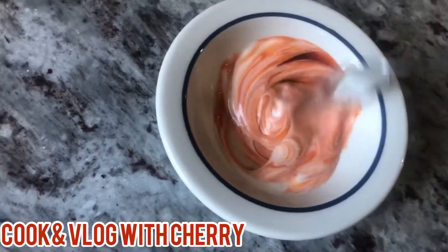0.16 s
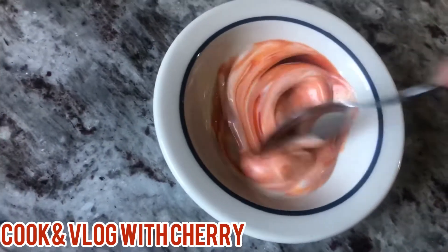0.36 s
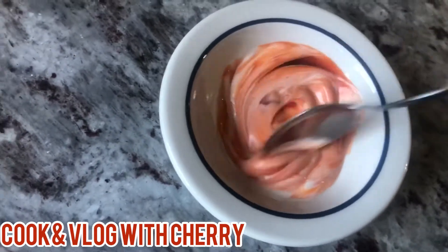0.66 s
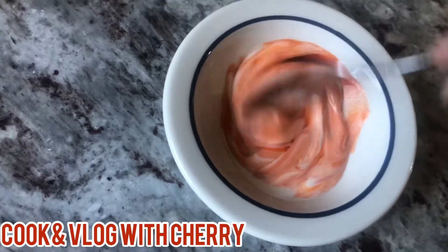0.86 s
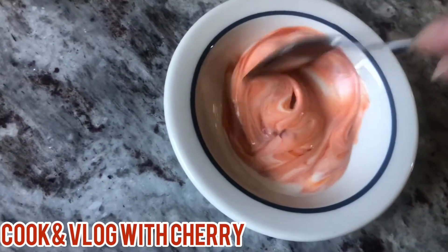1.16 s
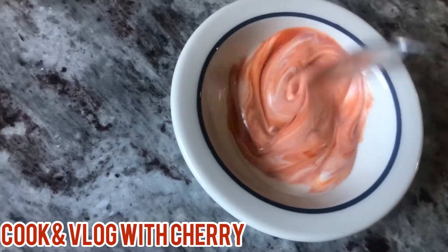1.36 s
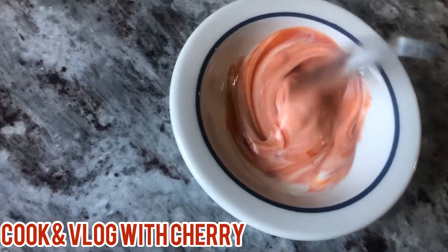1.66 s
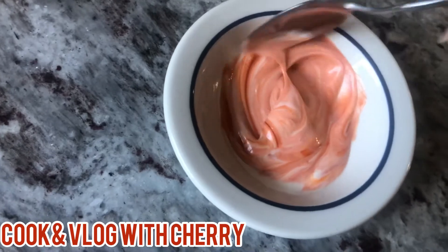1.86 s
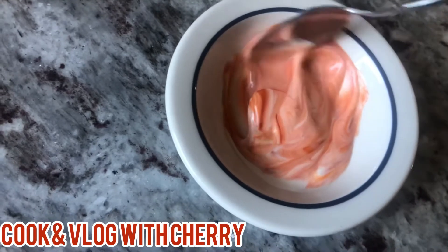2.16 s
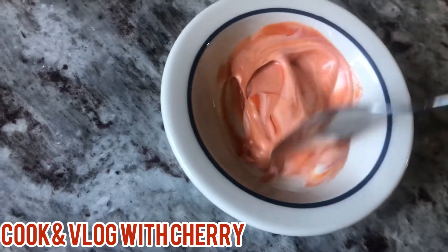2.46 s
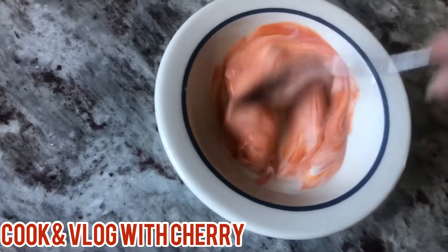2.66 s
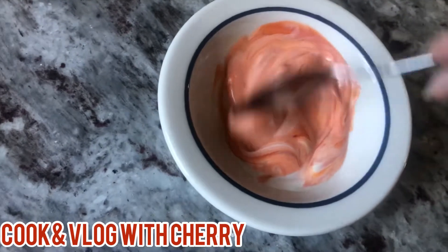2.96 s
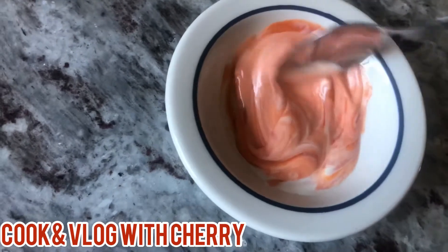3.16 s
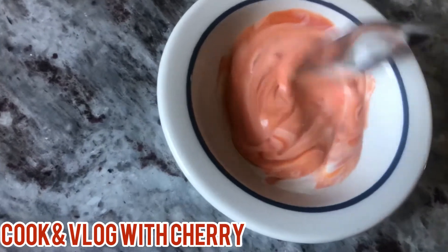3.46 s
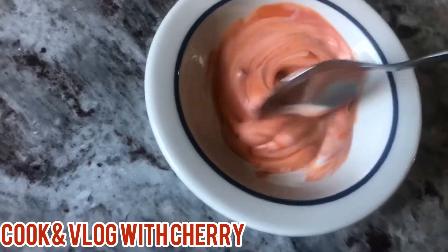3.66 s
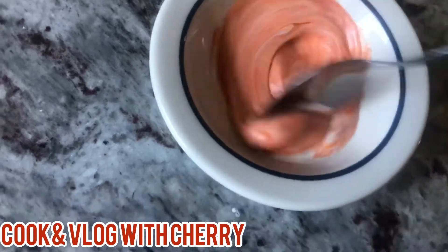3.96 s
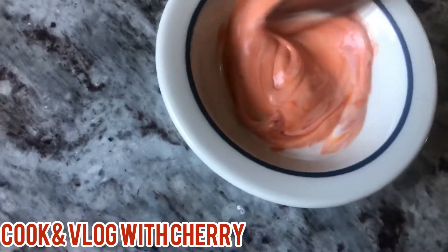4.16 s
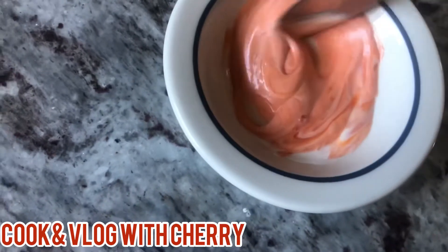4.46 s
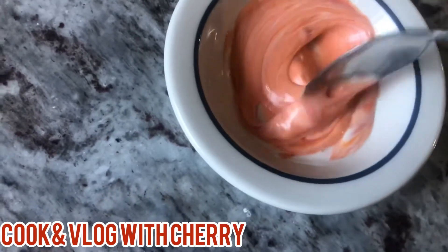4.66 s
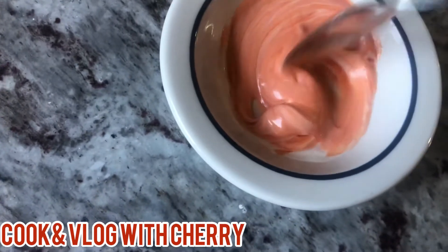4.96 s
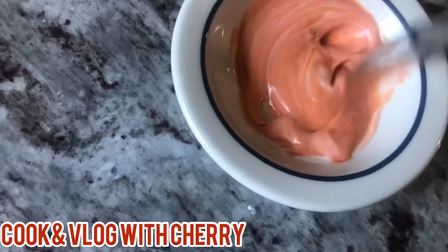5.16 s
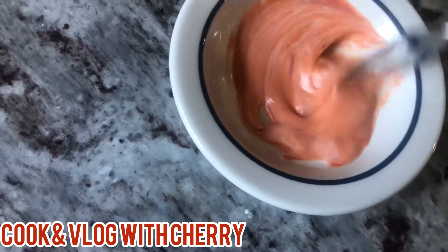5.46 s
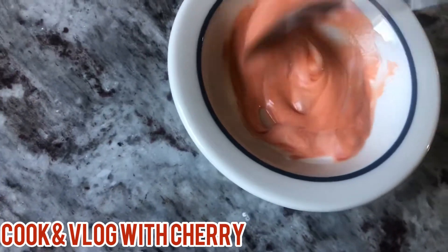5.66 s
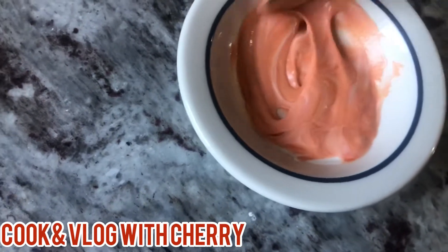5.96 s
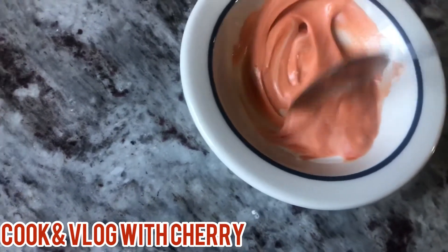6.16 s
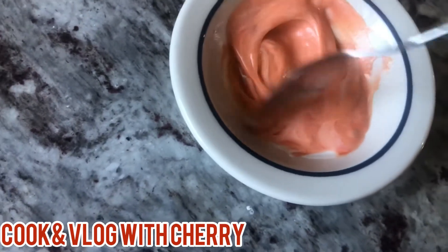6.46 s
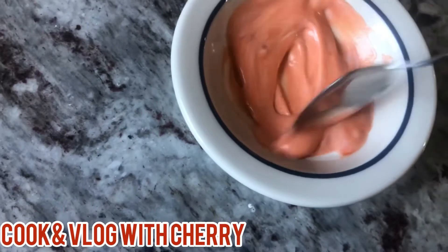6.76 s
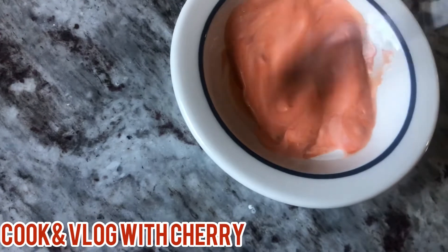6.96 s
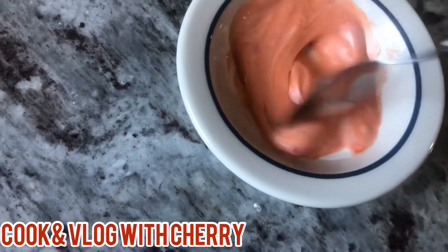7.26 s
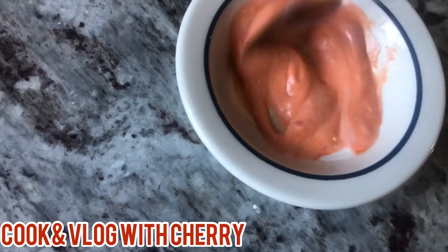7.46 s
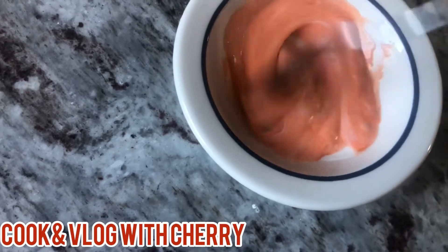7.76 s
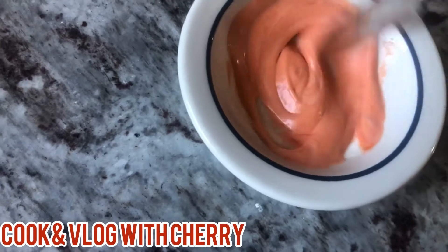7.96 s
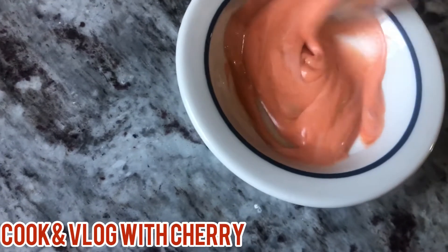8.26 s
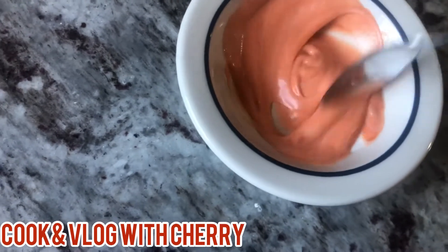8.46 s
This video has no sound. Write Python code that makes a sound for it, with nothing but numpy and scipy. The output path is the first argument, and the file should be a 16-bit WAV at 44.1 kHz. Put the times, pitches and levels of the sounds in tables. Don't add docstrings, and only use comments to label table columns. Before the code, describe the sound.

A metal spoon stirs thick sauce in a small ceramic bowl, scraping wetly and grittily with sharp bright clinks, growing faster, in a quiet kitchen.

```python
import sys
import numpy as np
from scipy import signal
from scipy.fft import rfft, irfft, next_fast_len
from scipy.io import wavfile
from scipy.ndimage import uniform_filter1d, map_coordinates

SR = 44100
rng = np.random.default_rng(int(sys.argv[2]) if len(sys.argv) > 2 else 0)


def store_pcm(level_fs):
    pcm = np.round(np.clip(level_fs, -1, 1) * 32767).astype(np.int16)
    wavfile.write(sys.argv[1], SR, np.atleast_2d(pcm).T)


def ratio(d):
    e = np.asarray(d, float) / 20
    return 10 ** e


N = 380141

# frequency [Hz], width [Hz], level [dB].
LOW_MODES = [(1057, 73, 6.5), (1321, 237, 8.5), (1561, 145, 8)]
# frequency [Hz], width [Hz], level [dB].
MIDDLE_MODES = [(1827, 34, 1.5), (2300, 240, 6), (2820, 380, 3.5), (3112, 990, 7), (3985, 195, -2.5),
                (4410, 270, -10.5)]
# frequency [Hz], width [Hz], level [dB].
BRIGHT_MODES = [(5500, 600, -13), (6550, 300, -4), (7550, 300, -9), (8350, 600, -13), (9200, 300, -8),
                (11450, 350, -12), (12100, 300, -13), (12900, 500, -19), (13800, 400, -14),
                (14900, 600, -20)]
# frequency [Hz], t60 [s], level [dB].
RIM_LOW_MODES = [(2677, .32, -19), (2714, .055, -2), (2700, .25, -23), (2684, .06, -5), (2970, .05, -9),
                 (3930, .04, -14)]
# frequency [Hz], t60 [s], level [dB].
RIM_HIGH_MODES = [(6257, .3, -19), (6270, .1, 0), (6287, .26, -19), (10793, .075, 0), (10810, .16, -23),
                  (13780, .03, -20)]


def unit(x):
    return x / np.sqrt(np.mean(np.abs(x) ** 2) + 1e-20)


def along(points, hz):
    f, v = np.transpose(points)
    return np.interp(np.log(hz + 1), np.log(f + 1), v)


def wobble(knots_per_s):
    knots = rng.standard_normal(int(N * knots_per_s / SR) + 4)
    return map_coordinates(knots, [np.arange(N) * knots_per_s / SR])


def filtered(x, response):
    m = next_fast_len(N + SR // 2)
    return irfft(rfft(x, m) * response(np.fft.rfftfreq(m, 1 / SR)), m)[:N]


def body(x, modes):
    scale = SR / (2 * np.pi * sum(ratio(db) * w for _, w, db in modes))

    def response(f):
        return sum((-1) ** k * ratio(db) * 1j * f * w / (c * c - f * f + 1j * f * w)
                   for k, (c, w, db) in enumerate(modes))

    return scale * filtered(x, response)


def rim(x, modes):
    widths_hz = [np.log(1000) / (np.pi * t60) for _, t60, _ in modes]
    return body(x, [(hz, w, db - 20 * np.log10(w)) for (hz, _, db), w in zip(modes, widths_hz)])


def swells(s, length_s, db):
    rise, fall, sharpness = 0.43, 0.37, 2.36
    t, out = np.arange(N) / SR, np.zeros(N)
    for at, span, top_db in zip(s, length_s, db):
        near = slice(max(int((at - 2 * span) * SR), 0), int((at + 2 * span) * SR))
        late = t[near] - at
        side_s = span * np.where(late < 0, rise, fall)
        out[near] += ratio(top_db) * np.exp(-np.abs(late / side_s) ** sharpness)
    return out


def appliances():
    # frequency [Hz], density [dB per Hz].
    hum_spectrum = [(25, -40.5), (50, -5), (105, -2.5), (160, -12), (210, -6), (400, -7), (700, -14),
                    (900, -15), (1500, -18), (3000, -29.5), (8000, -41), (9900, -31.5), (13000, -48.5),
                    (15000, -37.5)]
    # frequency [Hz], level [dB].
    whines = [(84, -70), (106, -69), (212, -73), (242, -73), (405, -73), (524, -75), (695, -77),
              (9798, -92), (9900, -93), (14998, -96), (15299, -98)]
    t = np.arange(N) / SR
    hum = unit(filtered(rng.standard_normal(N), lambda hz: ratio(along(hum_spectrum, hz))))
    hum = ratio(-58.5 + 1.3 * wobble(0.9)) * hum
    whine = sum(ratio(db + 3 + 3 * wobble(8)) * np.sin(2 * np.pi * hz * t + 1.5 * wobble(12))
                for hz, db in whines)
    return hum + whine


def traffic():
    # time [s], length [s], level [dB].
    lorry = (3.0, .4, -58)
    spectrum = [(15, -46), (30, -30.5), (50, -25.5), (70, -37), (200, -114)]  # Hz, dB
    rumble = unit(filtered(rng.standard_normal(N), lambda hz: ratio(along(spectrum, hz))))
    return (ratio(-70) + swells(*np.transpose([lorry]))) * rumble


def last_knock():
    echo_db, echo_t60_s, low_ring_db, high_ring_db = -48.5, 0.5, -43, -51
    t = np.arange(N) / SR
    echo = unit(body(rng.standard_normal(N), [(765, 280, 0)]))
    echo = ratio(echo_db - 60 * t / echo_t60_s) * echo
    ring = ratio(low_ring_db) * rim(t == 0, RIM_LOW_MODES[:1])
    return echo + ring + ratio(high_ring_db) * rim(t == 0, RIM_HIGH_MODES[::4])


def clinks():
    # time [s], peak [dB], thud [dB], bright [dB].
    touches = [(.004, -40, 0, -26), (0.2042, -31, 6.5, -16), (1.272, -45.5, -28, 8), (1.304, -29, 0, -16),
               (1.638, -60.5, 21.5, -39.5), (2.7153, -35, 2, 3), (3.195, -29.5, 6, -27),
               (3.6262, -37, -15, -27), (3.749, -31.5, 2.5, -29), (4.318, -23.5, 2, -16),
               (4.7, -42, -22.5, -9), (5.1676, -29, -12, -38.5), (5.492, -28.5, -9, -13),
               (5.805, -41.5, -31, 10), (5.8317, -30.5, -9, 1.5), (6.594, -33, 9.5, -24),
               (7.133, -26.5, 7.5, -23), (7.1721, -23.5, -9, -4.5), (7.2939, -24, 5.5, -4),
               (7.7022, -22.5, 3.5, -5)]
    # time [s], peak [dB], bright [dB],
    # low rim [dB], high rim [dB].
    knocks = [(0.1129, -28, -25, -49, -62), (0.134, -11.5, -4.5, -50, -59), (0.3201, -23.5, -10, -40, -43),
              (0.8673, -21, -9, -41, -47), (1.3105, -12.5, 0, -37, -44), (1.3687, -17.5, -10, -33, -52),
              (1.7455, -19, 6.5, -26.5, -22), (2.0905, -26.5, 4, -30.5, -33),
              (2.3677, -5, -9.5, -35.5, -34.5), (2.594, -2.5, -7, -37, -42), (2.838, -2, -10, -33, -44),
              (4.7225, -1, -3.5, -29, -30.5), (4.9969, -0.5, -17, -34.5, -29.5),
              (5.1041, -41, 11, -14, -18), (5.3658, -13, -1, -29.5, -38.5), (5.426, -22, -31.5, -52, -37),
              (6.2593, -16.5, 6.5, -29, -37), (6.4534, -21, -3, -44, -86), (6.5555, -22, -7.5, -35, -64),
              (6.6859, -13, -13, -29, -41), (2.954, -30, -19, -31, -51), (7.7589, -12.5, -10.5, -32.5, -39),
              (7.809, -18, -6, -29, -47), (7.9517, -31.5, 0, -30, -46)]
    # time [s], peak
    # [dB], thud [dB], bright [dB].
    ticks = [(0.0403, -26, -10, -21), (0.2333, -20, -20, -5), (0.407, -21, -12, 0.5),
             (0.538, -24, -14, -8), (0.646, -19, -14, -1.5), (0.7, -23, -13, -3),
             (0.9938, -23, -8, -12), (1.0095, -24, -4.5, 0), (1.1145, -17.5, -18, -12),
             (1.432, -19.5, -5, -11), (1.8417, -22, -19, -9), (1.867, -28, -16, -12),
             (2.1634, -39, -15, -14), (2.1856, -42, -12, -12), (2.206, -21.5, 1, -5),
             (3.0127, -25, -14, -12), (3.1588, -25, 6, -8), (3.2054, -27, -10, -4),
             (3.2226, -24, 7, -14), (3.3383, -36, -19, -12), (3.374, -21, -24, 1),
             (3.424, -26.5, -15, 2), (3.4914, -38, -10, -12), (3.6404, -22, -14, -7),
             (3.662, -18.5, -16, -18), (3.7963, -24.5, -11, -6), (3.8387, -21, -19, -12),
             (3.9609, -17, -15, -4), (3.9958, -36, -15, -12), (4.1462, -24, -20, -5),
             (4.397, -31, -10, -10), (4.416, -23, 1, -11), (4.4857, -14.5, -13, -2.5),
             (4.5694, -53, -8, -13.5),
             (5.078, -31, -20, 11), (6.016, -30, 11.5, -17.5), (5.1382, -19.5, -15, -10),
                  (5.8664, -41, -10, -10), (5.9406, -27, -1, -10), (6.0664, -40, -5, -15),
                  (6.178, -49, -11.5, -11), (6.332, -31, 3, -15), (6.6357, -11, -11, -11),
                  (6.8702, -23, -7, -2), (6.913, -16.5, -25, -8), (7.0283, -14.5, -18, -5),
                  (7.073, -29, -4, -1), (7.1118, -29, 7, -24), (7.239, -24, -11, -12),
                  (7.397, -18, -15, -1), (7.438, -17, -19, -16), (7.5303, -17.5, -23, -0.5),
                  (7.57, -20, -8, 1), (7.654, -18, 2, -16), (7.6761, -6, -10, -12), (7.898, -29, -10, -10),
                  (8.0292, -18, -20, -17), (8.128, -27, -17, -14), (8.2147, -21.5, -15, -22),
                  (8.2514, -30, -10, -16), (8.2864, -27, -16, -17), (8.4082, -17.5, -19, -16),
                  (8.4427, -23, -24, 4), (8.4623, -17, -23, -13), (8.515, -36, -3, -17),
                  (8.536, -18, -8, -21), (6.261, -8.5, -13, 5), (6.2622, -9.5, -4.5, 9)]
    # time [s], chatter [dB], chatter t60 [s], top rim modes [dB].
    landings = [
        (1.31, -3, 0.039, 17),
        (1.745, 2.5, 0.038, 1),
        (2.367, -8, 0.038, -0.5),
        (2.594, -1, 0.021, -13),
        (2.838, -18, 0.06, -8),
        (4.722, -4, 0.044, 2.5),
        (4.996, -4, 0.027, 0),
        (5.366, -1, 0.028, 2.5),
        (6.259, 6.5, 0.025, 13),
    ]
    thud_db, thud_per_db = -16.5, -0.61
    touch_rim_db, rim_per_thud, touch_high_rim_db = -31, 0.6, -39.5
    tick_db = -10.5
    chatter_db, chatter_t60_s, rebound_bright_db = -3.5, 0.031, -6.5
    foot_per_db = 0.8

    rows = [(s, db, thud_db + thud_per_db * db, *rest) for s, db, *rest in knocks]
    rows += [(*row, touch_rim_db + rim_per_thud * row[2], touch_high_rim_db) for row in touches]
    rows += [(s, db + tick_db, thud, bright, touch_rim_db, touch_high_rim_db)
             for s, db, thud, bright in ticks]
    table = np.array(rows)
    landing = np.tile([chatter_db, chatter_t60_s, 0.], (len(table), 1))
    for s, *row in landings:
        landing[np.argmin(np.abs(table[:, 0] - s))] = row

    t = np.arange(int(.012 * SR)) / SR
    draw = rng.standard_normal((len(table), 2, len(t)))
    sparse = draw[:, 0] * (np.abs(draw[:, 1]) > 1.3)
    chatter = .21 * sparse * ratio(landing[:, :1] - 60 * t / landing[:, 1:2])
    chatter[:, :3] = [.3, .7, .3]
    at = np.round((table[:, :1] + .0005) * SR).astype(int) + np.arange(len(t))

    def blows(db, count=None):
        force = ratio(db)[:, None] * chatter[:, :count]
        return np.bincount(at[:, :count].ravel(), force.ravel(), N + len(t))[:N]

    def dulled(hz):
        return 1 / (1 + 1j * hz / 13000) ** 2 / (1 + (hz / 13000) ** 6)

    peak, thud, bright, low_rim, high_rim = table[:, 1:].T
    crack = ratio(11.5) * body(blows(peak, count=3), [(2960, 2670, 1)])
    wet = ratio(10.0) * body(blows(peak), MIDDLE_MODES) + ratio(2.0) * body(blows(peak + thud), LOW_MODES)
    bright_blows = blows(peak + bright + rebound_bright_db) + blows(peak + bright, count=3)
    wet = wet - ratio(10.0) * filtered(body(bright_blows, BRIGHT_MODES), dulled)
    foot = blows(peak + thud + np.maximum(thud, 0) + foot_per_db * peak)
    thump = ratio(-10) * body(foot, [(450, 140, -4.5), (726, 120, -1.0)])
    thump = np.roll(thump, int(0.00696 * SR))
    ring = ratio(22.5) * rim(blows(peak + low_rim, count=3), RIM_LOW_MODES)
    ring = ring + ratio(18.0) * rim(blows(peak + high_rim, count=3), RIM_HIGH_MODES[:3])
    top = blows(peak + high_rim + landing[:, 2], count=3)
    ring = ring + ratio(15) * rim(top, RIM_HIGH_MODES[3:])
    return crack + wet + thump + ring


def strokes():
    # start [s], end [s], pressure [dB], rim [dB].
    contacts = [(0.041, 0.057, -40.5, -68), (0.151, 0.28, -45, -59.5), (0.317, 0.527, -50, -74),
                (0.48, 0.816, -45.5, -70), (0.876, 1.17, -49, -83), (1.372, 1.488, -45.5, -63),
                (1.77, 1.949, -51.5, -63.5), (2.106, 2.283, -52.5, -72), (2.382, 2.493, -49, -71),
                (2.596, 2.756, -45.5, -61), (2.838, 3.142, -47.5, -78), (3.151, 3.697, -46.5, -67.5),
                (3.702, 4.114, -47, -64), (4.097, 4.41, -42.5, -65.5), (4.406, 4.532, -48, -56.5),
                (4.735, 4.835, -47.5, -57), (5.002, 5.148, -46.5, -81), (5.173, 5.274, -48.5, -85.5),
                (5.374, 5.457, -47, -86), (5.501, 5.678, -45.5, -66), (5.86, 6.0, -50.5, -66.5),
                (5.964, 6.108, -46, -64), (6.3, 6.407, -41, -64.5), (6.464, 6.493, -55, -81),
                (6.561, 6.958, -44.5, -67), (6.945, 7.352, -46, -84), (7.36, 7.733, -43, -60.5),
                (7.767, 7.919, -46.5, -83), (7.962, 8.304, -46.5, -61), (8.29, 8.624, -45.5, -69)]
    # time [s], length [s], share of pressure lost [0-1].
    turns = [(0.443, 0.048, 0.55), (0.981, 0.032, 1), (3.111, 0.037, 0.43), (3.268, 0.024, 0.32),
             (3.453, 0.024, 0.24), (3.705, 0.061, 0.38), (3.902, 0.043, 0.71), (4.132, 0.071, 0.54),
             (4.372, 0.062, 0.57), (6.828, 0.043, 0.75), (6.954, 0.088, 0.42), (7.089, 0.053, 0.81),
             (7.374, 0.044, 0.76), (7.506, 0.08, 0.45), (7.623, 0.029, 0.75), (8.078, 0.072, 0.29),
             (8.2, 0.076, 0.33), (8.348, 0.045, 0.44), (8.476, .03, .4)]
    # time [s], length [s], level [dB], scoop pitch [Hz].
    pushes = [(0.21, 0.085, -55, 2300), (0.26, 0.032, -36, 2110), (0.39, 0.12, -45, 2160),
              (0.577, 0.24, -49.5, 2120), (0.796, 0.033, -39.5, 2060), (0.912, 0.041, -44.5, 2080),
              (1.05, 0.11, -49.5, 2300), (1.141, 0.064, -35.5, 2180), (1.454, 0.087, -40, 2160),
              (1.908, 0.088, -54, 2140), (2.247, 0.066, -44, 2380), (2.466, 0.035, -41.5, 2180),
              (2.624, 0.082, -37, 2400), (2.726, 0.058, -46, 2100), (2.914, 0.25, -47, 1950),
              (3.03, 0.04, -41, 2270), (3.213, 0.15, -41.5, 2130), (3.354, 0.089, -43, 2170),
              (3.605, 0.2, -45, 2120), (3.855, 0.11, -36.5, 2204), (3.96, 0.14, -53, 2200),
              (4.08, 0.082, -51.5, 1990), (4.193, 0.09, -35, 2560), (4.445, 0.13, -37.5, 2250),
              (5.215, 0.22, -39.5, 2200), (5.631, 0.1, -38.5, 2194), (6.024, 0.076, -42.5, 2180),
                   (6.375, 0.073, -41.5, 2230), (6.633, 0.092, -34, 2507), (6.765, 0.081, -44.5, 2200),
                   (6.89, 0.15, -37, 2225), (7.03, 0.049, -37.5, 2307), (7.153, 0.1, -33.5, 2367),
                   (7.232, 1, -44.5, 2160), (7.435, 0.077, -36, 2325), (7.543, 0.028, -48, 2300),
                   (7.588, 0.04, -58, 2140), (7.866, 0.096, -38, 2300), (8.01, 0.13, -32.5, 2237),
                   (8.125, 0.084, -39.5, 2300), (8.292, 0.19, -34.5, 2300), (8.443, 0.075, -38.5, 2226),
                   (8.517, 0.056, -35, 2455), (8.574, 0.057, -29, 2530)]
    # time [s], length [s], slide [Hz].
    tilts = [
        (1.054, 0.052, 604),
        (3.855, 0.072, -250),
        (4.179, 0.023, -450),
        (4.431, 0.035, 303.5),
        (6.634, 0.042, 502),
        (7.148, 0.048, 246.5),
        (7.465, 0.028, -300),
        (7.673, .03, 343),
        (8.261, 0.075, 220),
        (8.54, 0.036, 180),
    ]
    # time [s], length [s], level [dB], bright [dB].
    skids = [(0.05, 0.019, -52, -17), (0.262, 0.028, -45.5, -16), (0.395, 0.13, -47.5, 3.5),
             (0.543, 0.061, -61, 1), (0.662, 0.073, -48, 0.5), (0.93, 0.067, -46.5, 0.5),
             (1.01, 0.077, -50.5, -1.5), (1.138, 0.14, -48.5, -10), (1.452, 0.05, -46, -6),
             (1.878, 0.074, -49, 10.5), (2.219, 0.082, -50, 14.5), (2.449, 0.086, -43, -1),
             (2.729, 0.043, -45, 5), (2.982, 0.06, -50, -28), (3.041, 0.063, -49, 2.5),
             (3.167, 0.26, -60.5, 1.5), (3.371, 0.081, -44, 2.5), (3.52, 0.12, -54.5, 6.5),
             (3.67, 0.1, -44.5, -1), (3.84, 0.12, -48.5, -5), (4.003, 0.15, -41, -4),
             (4.176, 0.075, -42.5, -1), (4.461, 0.042, -50, -9.5),
             (5.1, 0.07, -41.5, 5.5), (5.258, 0.032, -50, -9), (5.634, 0.091, -46, -4),
                  (5.874, 0.02, -67, 23.5), (5.972, 0.087, -49, 12.5), (6.034, 0.032, -55, 14),
                  (6.09, 0.036, -57, 2.5), (6.341, 0.027, -46, 4), (6.648, 0.056, -35.5, -6),
                  (6.772, 0.16, -48.5, 4.5), (6.907, 0.053, -35, -9.5), (7.028, 0.14, -42.5, -0.5),
                  (7.172, 0.064, -42, -3), (7.283, 0.14, -39.5, -3.5), (7.412, 0.097, -44, 2),
                  (7.58, 0.32, -46, 2.5), (7.848, 0.1, -41, 2), (7.91, 0.043, -46.5, 9),
                  (7.99, 0.11, -44.5, -12), (8.15, 0.2, -41.5, -2.5), (8.318, 0.068, -40, -3.5),
                  (8.441, 0.13, -44, 2.5), (8.573, 0.046, -40, 1)]
    scoop_rest_db, grit_rest_db, bright_rest_db = -13.5, -15.5, -8
    push_to_low_db, skid_to_rim_db = -13, -25.5
    land_s = .016
    clean_rise_per_db = .003

    t, held = np.arange(N) / SR, np.zeros((3, N))
    for start, end, *db in contacts:
        held[:, int(start * SR):int(end * SR)] = ratio([*db, 0])[:, None]
    pressure, hum, touching = np.abs(uniform_filter1d(held, size=int(land_s * SR), axis=1))
    s, length, share = np.transpose(turns)
    lost = swells(s, length, 20 * np.log10(np.clip(share, .01, 1)))
    eased = np.clip(1 - lost, .1, 1)
    pressure, touching = eased * pressure, eased * touching

    s, length, db, hz = np.transpose(pushes)
    push = touching * swells(s, length, db - 4.0)
    scoop_hz = np.interp(t, s, hz)
    for at, span, slide in tilts:
        near = slice(int((at - 3 * span) * SR), int((at + 3 * span) * SR))
        u = (t[near] - at) / span
        scoop_hz[near] += slide * u * np.exp(-u ** 2 / 2)

    s, length, db, bright_db = np.transpose(skids)
    skid = touching * swells(s, length, db - 5.5)
    low = ratio(-6.5) * pressure + ratio(push_to_low_db) * push
    scoop = ratio(scoop_rest_db) * pressure + push
    grit = ratio(grit_rest_db) * pressure + skid
    bright = ratio(bright_rest_db) * pressure + touching * swells(s, length, db + bright_db + 0.5)
    hum = ratio(4.4 * wobble(7.1)) * hum + ratio(skid_to_rim_db) * skid
    clean = clean_rise_per_db * np.interp(t, s, np.maximum(bright_db, 0))
    return scoop_hz, low, scoop, grit, bright, hum, clean


def slips(per_second, spread_db, surge_db):
    size_db = spread_db * np.minimum(rng.exponential(size=N), 2.5)
    kicks = (rng.random(N) < per_second / SR) * ratio(size_db)
    rubbing = (0.15 + kicks) * rng.standard_normal(N)
    return unit(rubbing * ratio(surge_db * wobble(90) + .5 * surge_db * wobble(35)))


def gliding_mode(x, hz, width_hz):
    turn = np.exp(2j * np.pi * np.cumsum(hz) / SR)
    pole = np.exp(-np.pi * width_hz / SR)
    smooth = signal.lfilter([1], [1, -pole ** 3], x / turn)
    return (signal.lfilter([1], [1, -pole], smooth) * turn).real


def mottled(x, patchy_db):
    z = signal.stft(x, nperseg=256)[2]
    field = uniform_filter1d(rng.standard_normal(z.shape), size=4, axis=0)
    field = uniform_filter1d(field, size=12, axis=1)
    return unit(signal.istft(z * ratio(patchy_db * unit(field)), nperseg=256)[1][:N])


def scrape():
    # frequency [Hz], width [Hz], level [dB].
    blade = [(7380, 140, -3), (11280, 180, -8.5)]
    # time [s], length [s], level [dB].
    sings = [(1.871, 0.053, -47.5), (2.204, 0.1, -45), (2.717, .05, -61), (4.44, .04, -53),
             (5.12, 0.078, -58), (5.435, 0.048, -59), (5.6, 0.091, -64), (5.866, 0.013, -43),
             (5.99, 0.087, -44), (6.027, 0.056, -54), (6.717, 0.026, -56), (6.343, 0.053, -44),
             (6.635, 0.053, -41), (7.167, 0.021, -42), (7.406, 0.072, -48), (7.662, 0.034, -57),
             (7.997, 0.045, -55), (8.573, 0.034, -44)]
    # time [s], length [s], level [dB].
    squeals = [
        (0.57, .12, -64),
        (2.25, 0.044, -49),
        (3.85, .1, -55),
        (4.207, .06, -44),
        (4.512, 0.045, -44.5),
        (5.62, 0.084, -51.5),
        (6.04, 0.096, -46.5),
        (7.722, 0.042, -39.5),
    ]
    tip_hz, tip_wander = 4120, .025
    scoop_hz, low, scoop, grit, bright, hum, clean = strokes()
    drag = slips(450, spread_db=0.0, surge_db=2.0)
    edge = slips(500, spread_db=3.5, surge_db=2.2)

    def small(x):
        return filtered(x, lambda hz: 1 / (1 + (1280 / (hz + 1)) ** 6))

    wet = ratio(3.5) * low * mottled(small(body(drag, LOW_MODES)), patchy_db=2.0)
    wet = wet + ratio(-4) * low * unit(small(body(drag, [(1940, 230, 0)])))
    wander_hz = scoop_hz * (1 + .018 * wobble(25))
    wet = wet + ratio(-0.17) * scoop * mottled(gliding_mode(drag, wander_hz, width_hz=130), patchy_db=3.0)
    wet = wet + ratio(-1) * scoop * unit(gliding_mode(edge, 0.98 * wander_hz, width_hz=150))
    tip = gliding_mode(edge, tip_hz * (1 + tip_wander * wobble(30)), width_hz=260)
    wet = wet + ratio(-5 + 2.5 * wobble(12)) * grit * mottled(tip, patchy_db=3)
    wet = wet + ratio(-2) * grit * mottled(body(drag, MIDDLE_MODES[2:]), patchy_db=2.2)
    wet = wet + ratio(-11.0) * bright * mottled(body(edge, BRIGHT_MODES), patchy_db=7.5)
    lift = 1 + clean + .008 * wobble(15)
    wet = wet + bright * sum(ratio(db - 6.5) * mottled(gliding_mode(edge, hz * lift, w), patchy_db=4.5)
                             for hz, w, db in blade)

    ring = ratio(-8.0) * rim(drag * hum, RIM_LOW_MODES[:3])
    ring = ring + ratio(-32.0) * rim(edge * np.sqrt(bright * hum), RIM_HIGH_MODES[:3])
    phase = 2 * np.pi * RIM_LOW_MODES[0][0] * np.arange(N) / SR + .5 * wobble(20)
    squeal = np.sin(phase) * swells(*np.transpose(squeals))
    ring = ring + ratio(-56) * rim(squeal, RIM_LOW_MODES[:1])
    sing = drag * swells(*np.transpose(sings))
    ring = ring + ratio(-20.5) * rim(sing, RIM_HIGH_MODES[:3])
    ring = ring + ratio(-30) * rim(sing, RIM_HIGH_MODES[3:4])
    return wet + ring


def room_echo(x):
    # frequency [Hz], t60 [s].
    decay = [(300, .4), (2000, .42), (6000, .36), (14000, .2)]
    hz, t, z = signal.stft(rng.standard_normal(SR // 2), SR, nperseg=256)
    fade = ratio(-60 * t / along(decay, hz)[:, None])
    tail = signal.istft(z * fade, SR, nperseg=256)[1]
    delayed = np.pad(x, (150, 0))
    return signal.fftconvolve(delayed, tail / np.linalg.norm(tail))[:N]


def scene():
    background = appliances() + traffic() + last_knock()
    bowl = clinks() + scrape()
    return (bowl + ratio(-18.0) * room_echo(bowl) + background)[None]


def low_pass(x):
    return signal.sosfilt(signal.butter(12, 16850, fs=SR, output="sos"), x)


def record(dry):
    band = [(22, -14), (38, 0), (15550, 0), (15800, -28), (16900, -36)]  # Hz, dB
    mix = filtered(dry[0], lambda hz: ratio(along(band, hz)))[None]
    return low_pass(mix)


dry = scene()
out = record(dry)
store_pcm(out)
```